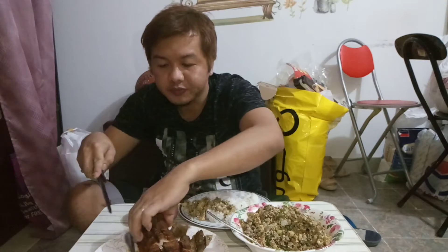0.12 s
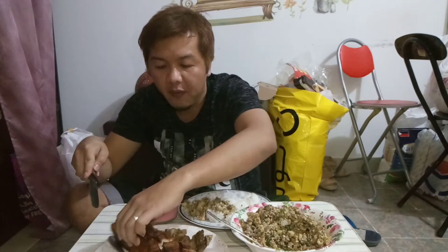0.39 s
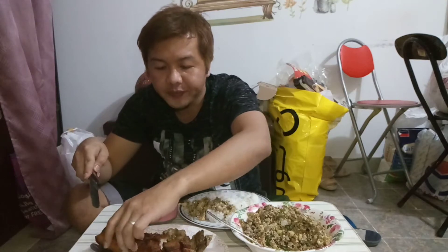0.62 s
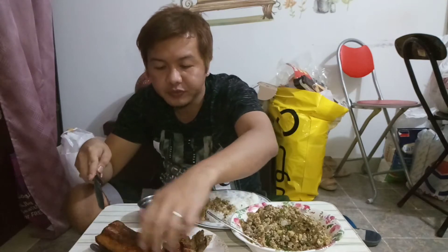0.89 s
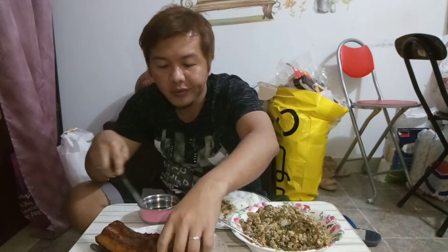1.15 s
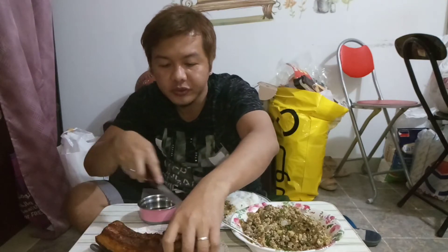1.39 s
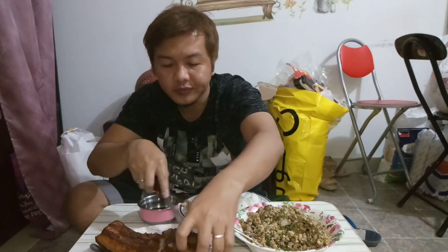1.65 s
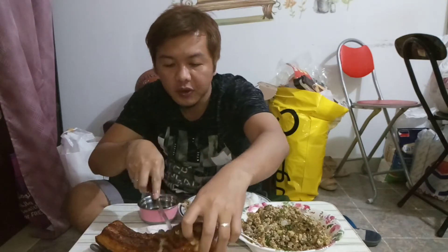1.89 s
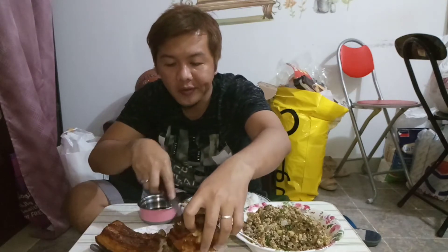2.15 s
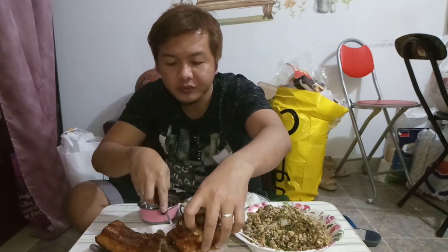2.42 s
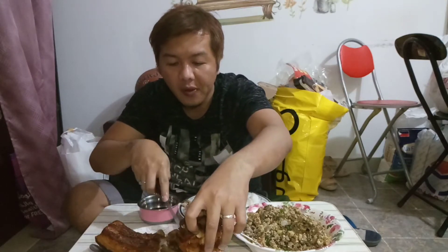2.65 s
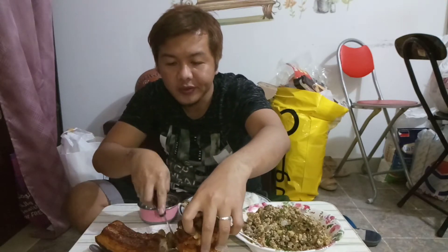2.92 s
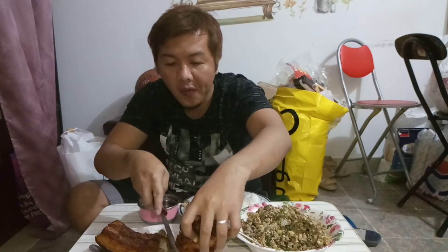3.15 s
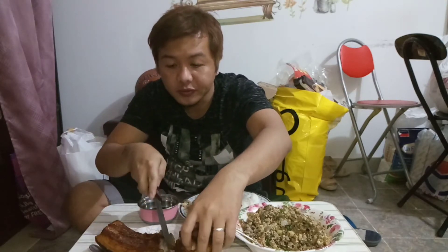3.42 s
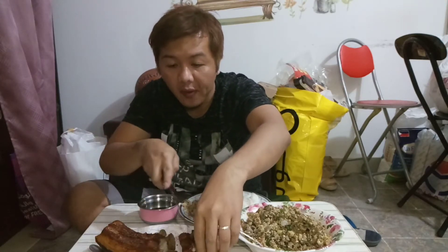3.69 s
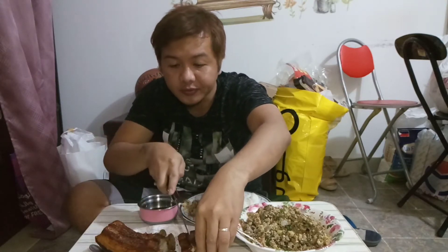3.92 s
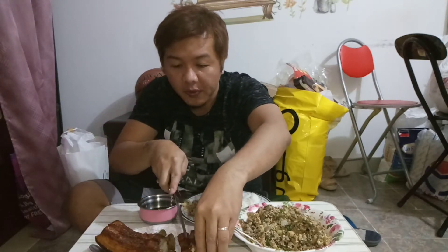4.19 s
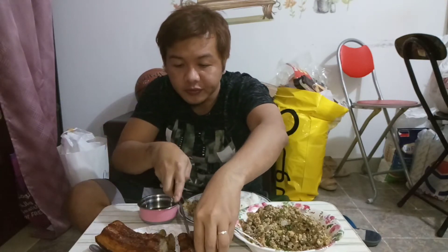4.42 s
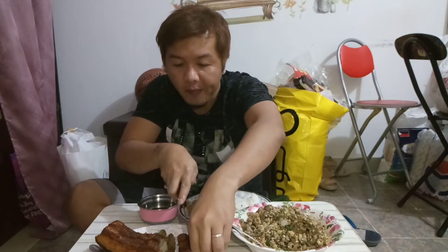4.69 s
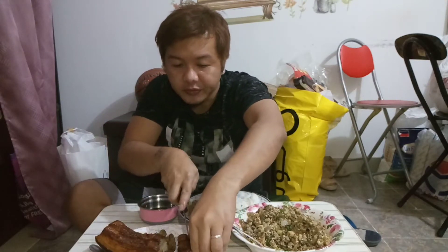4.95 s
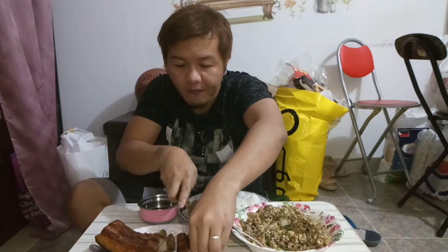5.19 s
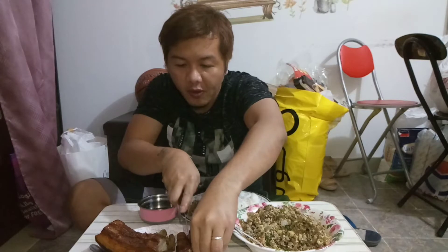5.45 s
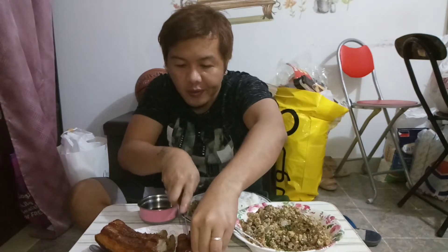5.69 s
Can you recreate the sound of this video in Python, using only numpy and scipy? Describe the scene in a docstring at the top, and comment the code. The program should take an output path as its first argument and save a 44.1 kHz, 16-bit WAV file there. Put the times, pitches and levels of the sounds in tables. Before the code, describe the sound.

Sharp knife blows clack on a plate, with crisp crust snapping, small clinks and faint scrapes in a small hard-walled room.

```python
"""A knife saws through crisp roast skin on a plate in a small tiled room, heard by a phone's microphone.
A low household rumble and faint hiss, both filtered noise, run throughout. Over them the blade drags as
random grit ringing through squeak tones, and the tiled walls answer with a short tail of fading noise.
Short bright noise ticks are crust snaps and the hard edge of the blade's blows on the plate; clinks and
table knocks mix a noise burst with decaying sines. Past three seconds the free blade sings once, as sines."""
import sys
import numpy as np
from scipy import signal
from scipy.fft import rfft, irfft
from scipy.io import wavfile
from scipy.ndimage import uniform_filter1d

SR = 44100
rng = np.random.default_rng(int(sys.argv[2]) if len(sys.argv) > 2 else 0)


def wav_out(sig):
    """Save sig, one row per channel (or a flat mono array), as 16-bit PCM at SR to the path in sys.argv[1]."""
    wavfile.write(sys.argv[1], SR, np.round(np.clip(np.atleast_2d(sig).T, -1, 1) * 32767).astype(np.int16))


def to_linear_factor(level_db):
    """Convert decibel levels (scalar or array-like) to linear amplitude factors."""
    exponent = np.asarray(level_db, float) / 20
    return 10 ** exponent


N = 257103  # length of the scene in samples


def unit(x):
    """Scale a sound to an rms (average strength) of 1."""
    return x / np.sqrt(np.mean(x ** 2))


def colour(x, points, causal=False):
    """Filter by a (Hz, dB) curve on a log-frequency axis; causal keeps all sound after the blow."""
    hz, db = np.transpose(sorted(points))
    f = np.maximum(np.fft.rfftfreq(len(x), 1 / SR), 1)
    gain = to_linear_factor(np.interp(np.log(f), np.log(hz), db))
    if causal:
        # Folding the cepstrum forward in time gives a minimum-phase filter.
        cepstrum = irfft(np.log(gain), len(x))
        cepstrum[1:len(x) // 2] *= 2
        cepstrum[len(x) // 2 + 1:] = 0
        gain = np.exp(rfft(cepstrum))
    return irfft(rfft(x) * gain, len(x))


def convolve(x, kernel):
    """Let every sample of x set off the kernel, cut to the length of x."""
    return signal.fftconvolve(x, kernel)[:len(x)]


def add(track, s, sound):
    """Mix a sound into the track at a time in seconds."""
    i = int(s * SR)
    track[i:i + len(sound)] += sound[:len(track) - i]


def ring(modes, spread_db, longest_s, size=16384):
    """Decaying sines of a damped body; each call shares the force among them afresh."""
    hz, db, t60 = np.transpose(modes)[:, :, None]
    chance = rng.standard_normal((len(modes), 3, 1))
    t = np.arange(size) / SR
    hz = hz * (1 + .006 * chance[:, 2])  # the load on the body shifts its modes a little
    # Damping by hand and food adds to each mode's own fading.
    fade = np.exp(-np.log(1000) * t * (1 / t60 + 1 / longest_s))
    level = to_linear_factor(db + spread_db * chance[:, 0])
    sines = np.sin(2 * np.pi * hz * t + chance[:, 1])
    return np.sum(level * fade * sines, axis=0)


def strike(body, ms, ring_db, points):
    """Contact noise swells and jangles while the body's ring builds up; the curve alone sets the energy."""
    ms = max(ms, .2)
    t = np.arange(len(body)) / SR / (ms / 1000)  # time counted in contact times
    chatter = to_linear_factor(3.5 * np.repeat(rng.standard_normal(len(t) // 64), 64))  # tiny re-touches
    fall = np.exp(-t) + to_linear_factor(-12) * np.exp(-t / 5)
    burst = (1 - np.exp(-2 * t)) * fall / np.sqrt(ms)
    noise = to_linear_factor(9) * burst * chatter * rng.standard_normal(len(t))
    ringing = to_linear_factor(ring_db) * body * (1 - np.exp(-t))
    sound = colour(noise + ringing, points, causal=True)
    curve_strength = np.linalg.norm(colour(1. * (t == 0), points))
    return to_linear_factor(32.5) * sound / np.linalg.norm(sound) * curve_strength


def background():
    """A low rumble of filtered noise swells and wavers, over steady filtered hiss."""
    # Slow swell of the rumble. Each row: time in seconds, level in dB.
    rumble_level = [(0.0, -61.5), (0.28, -63), (0.66, -61.5), (1.96, -64.5), (2.43, -63.5), (2.55, -65.5),
                    (2.94, -61), (3.44, -65), (4.14, -64.5), (4.38, -64.5), (5.11, -63.5), (5.45, -66),
                    (5.68, -62.5), (5.83, -59)]
    # Tone curve of the rumble. Each row: frequency in Hz, strength in dB per Hz.
    rumble_tone = [(15, -61), (25, -20.5), (43, -9.5), (64, -20), (86, -6), (148, -2), (199, -8),
                   (300, -7.5), (368, -16), (401, -10), (501, -21), (605, -14.5), (671, -24.5), (1200, -34),
                   (1500, -36.5), (1950, -77.5), (3300, -120)]
    # Tone curve of the hiss. Each row: frequency in Hz, strength in dB per Hz.
    hiss_tone = [(530, -34.5), (900, -3), (1480, -11.5), (1710, -1), (1820, -4.5), (1980, -5),
                 (5310, -10.5), (5770, -7.5), (7500, -18), (13100, -22), (15500, -10)]
    hiss_db = -82.5
    waver_per_s, waver_db = 9, 2.5  # quicker random wavering; dB scales it before smoothing
    t, hold = np.arange(N) / SR, int(SR / waver_per_s)
    waver = uniform_filter1d(np.repeat(rng.standard_normal(200), hold)[:N], hold)
    swell = to_linear_factor(np.interp(t, *np.transpose(rumble_level)) + waver_db * waver)
    rumble = unit(colour(rng.standard_normal(N), rumble_tone)) * swell
    hiss = to_linear_factor(hiss_db) * unit(colour(rng.standard_normal(N), hiss_tone))
    return rumble + hiss


def grit(rate, spread_db):
    """Random ticks of very uneven size, at a rate per second."""
    hit = rng.random(N) < rate / SR
    return unit(hit * rng.standard_normal(N) * to_linear_factor(spread_db * rng.exponential(size=N)))


def strokes():
    """Gains of drag and crumble: each stroke fades in, swells or sags evenly in dB, and fades out."""
    # Saw strokes. Each row: start in seconds, length in seconds, gain of the blade drag in dB and
    # of the crust crumble in dB (both at the end of the stroke), swell over the stroke in dB.
    saw_strokes = [(0.19, 0.22, -78, -83, 0), (0.40, 0.042, -85, -70, 2),
                   (0.462, 0.096, -48.5, -45.5, 24.5), (0.68, 0.076, -84, -95, -4),
                   (1.22, .07, -92, -101, -3), (1.43, 0.053, -89, -99, -2), (2.418, 0.1, -90.5, -95.5, 1),
                   (3.285, .04, -94, -78, 8.5), (3.399, 0.031, -94.5, -91, 1),
                   (3.599, 0.19, -90.5, -92, -0.5), (3.77, 0.06, -95, -94, -8.5),
                   (4.35, 0.032, -81, -76.5, 12), (4.42, 0.11, -76, -92, 14.5),
                   (4.60, 0.15, -94, -94.5, -1), (4.93, 0.23, -88.5, -92.5, 0),
                   (5.22, 0.44, -95.5, -86.5, 0.5), (5.687, 0.02, -87, -96, -12),
                   (5.745, 0.017, -90, -66.5, 23)]
    edge_s = 0.015  # length of each fade
    t, gains = np.arange(N) / SR, np.zeros((2, N))
    for s, length, drag_db, crumble_db, swell_db in saw_strokes:
        gate = np.clip(np.minimum(t - s + edge_s, s + length + edge_s - t) / edge_s, 0, 1)
        progress = np.clip((t - s) / length, 0, 1)
        push = gate * to_linear_factor(swell_db * (progress - 1))
        gains += to_linear_factor(np.array([[drag_db], [crumble_db]])) * push
    return gains


def sawing():
    """Stick-slip grit excites squeak tones under the drag; crumbs add a fine high crackle."""
    # Squeak tones heard under the drag. Each row: pitch in Hz, width in Hz before the extra damping, # level in
    # dB.
    squeak_tones = [(2330, 34, -6.5), (2730, 81, -5.5), (3250, 100, -2), (3560, 65, -8.5), (4320, 94, -3.5),
                    (5200, 51, -7.5), (6086, 70, -3.5), (7200, 77, -4), (7100, 101, -16), (8300, 63, -19.5)]
    slip = grit(rate=2500, spread_db=1.5)
    crumbs = grit(rate=3000, spread_db=1.5)
    drag, crumble = strokes()
    # A wider tone dies sooner.
    tones = [(hz, db, np.log(1000) / np.pi / width) for hz, width, db in squeak_tones]
    squeak_body = ring(tones, spread_db=1, longest_s=.5)
    squeak = convolve(slip * drag, squeak_body / np.linalg.norm(squeak_body))
    crumb = colour(crumbs, [(2500, 5), (5500, -6.0), (7000, 7.0), (8500, -26.0), (14000, -30.0)])
    return to_linear_factor(-1) * squeak + to_linear_factor(-8) * unit(crumb) * crumble


def room():
    """Echo of the tiled walls: bands of noise that die sooner in the treble."""
    # How long the echo lasts. Each row: frequency in Hz, time to fall by 60 dB in seconds.
    echo_times = [(150, .3), (600, .3), (2500, .25), (6000, .21), (12000, .16)]
    room_db, build_up_s = -2, 0.0025
    t = np.arange(24000) / SR
    hz, t60 = np.transpose(echo_times)
    tail = 0
    for f in 90 * 2 ** np.arange(0, 7.6, .5):  # half-octave bands
        edges = [(f / 1.42, -40), (f / 1.19, -3), (f, 0), (f * 1.19, -3), (f * 1.42, -40)]
        decay = np.interp(np.log(f), np.log(hz), t60)
        band = colour(rng.standard_normal(len(t)), edges)
        tail = tail + band * np.exp(-np.log(1000) * t / decay)
    tail = tail * (1 - np.exp(-t / build_up_s))  # reflections build up
    return to_linear_factor(room_db) * tail / np.linalg.norm(tail)


def bright_ticks():
    """Noise ticks of about a millisecond, each strongest at its own pitch: crust snaps and blow edges."""
    # Short bright ticks: crust snaps, and the sharp hard edge of the blade's blows on the plate.
    # Each row: time in seconds, relative level in dB, pitch in Hz, narrowness in dB
    # (how far the sound beside the pitch is turned down).
    tick_rows = [(0.3169, -58, 6000, -1.5), (0.534, -23, 6740, 14), (0.725, -64, 8200, 8.5),
                 (1.002, -65, 5200, 3), (1.169, -62, 8110, 14), (1.3403, -51.5, 7030, 22),
                 (1.9297, -52, 8170, 0), (2.1982, -21, 6200, 7), (2.46, -72.5, 8300, 23),
                 (2.4793, -62.5, 7050, 31), (2.556, -63, 11000, 3), (2.563, -57.5, 10300, 12),
                 (2.736, -60, 6670, 30), (2.7445, -21.5, 5410, 19), (2.8822, -55.5, 3400, 2),
                 (3.315, -66, 6500, 4.5), (3.357, -55.5, 6940, 17.5), (3.6151, -73, 7550, 7.5),
                 (3.7255, -68, 5880, 6), (3.742, -65, 6316, 5), (4.9536, -65.5, 6943, 20),
                 (5.3287, -67, 6800, 14.5), (5.342, -71.5, 6900, 15), (5.3696, -72.5, 6800, 9.5),
                 (5.486, -76.5, 5980, 5), (5.59, -72.5, 7300, 10), (5.614, -64.5, 7200, 7.5),
                 (5.6294, -56.5, 7000, 28), (5.656, -47, 7000, 5.5), (5.678, -52, 6730, 6.5)]
    out, t = np.zeros(N), np.arange(1024) / SR
    for s, db, hz, narrow_db in tick_rows:
        noise = rng.standard_normal(len(t)) * t * np.exp(-t / 0.00095)
        points = [(hz / 3, -3 * narrow_db - 6), (hz / 1.25, -narrow_db), (hz / 1.07, 0), (hz * 1.07, 0),
                  (hz * 1.1, -narrow_db), (15000, -narrow_db - 23.5)]
        tick = colour(noise / np.linalg.norm(noise), points, causal=True)
        add(out, s - .0012, to_linear_factor(db + 24.5) * tick)
    return out


def clinks(focus):
    """Each clink favours a low and a high region of the plate, set by the spot struck.

    focus is the share of the two picked-out pitches that is heard: all in front of the plate,
    little off the walls."""
    # Blade meets plate. Each row: time in seconds, relative level of the low clink in dB, its pitch
    # in Hz, relative level of the high clink in dB, its pitch in Hz.
    blows = [(0.3202, -46.5, 3130, -48.5, 6500), (0.356, -55, 3100, -66, 5800),
             (0.533, -32.5, 3600, -38, 6060), (0.725, -59.5, 2810, -65, 5760),
             (1.0155, -53.5, 2620, -80, 7480), (1.0204, -43.5, 2810, -58, 7500),
             (1.926, -55, 2500, -63, 3800), (1.9368, -43.5, 2620, -49, 4660),
             (1.958, -57.5, 3100, -65, 4660), (2.1983, -24, 3360, -27, 5970),
             (2.543, -49.5, 2434, -65, 5690), (2.552, -46, 2504, -49, 4100), (2.557, -44, 2500, -43, 4100),
             (2.561, -50.5, 3250, -61, 5200), (2.572, -50, 3020, -64, 5200),
             (2.582, -58.5, 2530, -54, 5200), (2.7448, -25.5, 2830, -22.5, 5490),
             (2.8798, -46, 2810, -45, 5080), (3.333, -72, 2940, -57, 5800),
             (3.343, -67.5, 3000, -55.5, 5800), (3.357, -61, 3850, -52, 5850),
             (3.6088, -69.5, 2400, -84.5, 5450), (3.642, -66, 2400, -82.5, 5770),
             (3.643, -69, 1550, -85, 5770), (3.664, -70.5, 2400, -85, 5770),
             (3.858, -71.5, 2590, -78.5, 6385), (4.137, -59, 2370, -57, 7536),
             (4.141, -45, 2280, -45.5, 6570), (4.1448, -55.5, 1550, -49, 5760),
             (4.155, -55, 3420, -63, 5970), (4.168, -62.5, 3740, -75, 6570), (4.38, -79.5, 2830, -63, 6000),
             (4.389, -58.5, 3500, -51, 5950), (4.389, -59, 4290, -54.5, 6690),
             (4.514, -70, 2427, -77, 6420), (4.531, -64.5, 2700, -83, 5910),
             (4.537, -54, 1840, -63.5, 5970), (4.5399, -55, 2374, -57.5, 7240),
             (4.567, -65.5, 2390, -78, 6000), (4.591, -67, 2400, -84, 5990),
             (5.0625, -61.5, 2537, -55, 5050), (5.067, -49, 2620, -51.5, 5050),
             (5.077, -59.5, 2290, -58, 6200), (5.126, -61.5, 2990, -65, 6600),
             (5.7737, -54, 3270, -46.5, 5510), (5.8191, -58.5, 1850, -54, 6700)]
    # Modes of the plate. Each row: pitch in Hz, level in dB, time to fall by 60 dB in seconds
    # before the extra damping.
    plate_modes = [(1550, -5.5, 0.45), (1840, -4.5, 0.25), (2010, -10, 0.072), (2219.4, -5, 0.9),
                   (2320, -2.5, 0.088), (2400, 0, 0.36), (2620, -5, 0.2), (2697, 0, 0.086),
                   (2818, -3.5, 0.4), (2911, -2, 0.089), (2850, -17, 0.18), (3496, -4, 0.13),
                   (3524, -3, 0.26), (3920, -11, 0.22), (3980, -17.5, 0.14), (4290, -7.5, 0.18),
                   (4660, -12.5, 0.4), (5080, -8, 0.072), (5130, -17, 0.5), (5500, -8.5, 0.17),
                   (5743, -15, 0.34), (5970, -5.5, 0.069), (6570, -8.5, 0.078), (7640, -11, 0.16),
                   (7100, -10.5, 0.32), (7400, -21, 0.23), (7650, -28, 0.57), (7980, -22, 0.46),
                   (8170, -17.5, 0.16), (8300, -19.5, 0.15)]
    out = np.zeros(N)
    for s, low_db, low_hz, high_db, high_hz in blows:
        loudest = max(low_db, high_db)
        # A harder blow touches for a shorter time (milliseconds).
        ms = 3.2 - 0.1782 * (max(loudest, -45) + 40)
        # A lighter touch picks out fewer modes: the sound beside its two pitches drops further.
        focus_db = np.clip(8 - 0.4 * (loudest + 40), 3, 14)
        low, high, peak_db = low_db - focus_db, high_db - focus_db, focus * focus_db
        middle_hz = np.sqrt(1.25 * low_hz * high_hz)
        points = [(low_hz / 3, low - 26), (low_hz / 1.8, low - 6), (low_hz / 1.09, low),
                  (low_hz, low + peak_db), (low_hz * 1.3, low), (middle_hz, min(low, high) - 1.5),
                  (high_hz / 0.88, high), (high_hz, high + peak_db), (high_hz * 1.06, high),
                  (high_hz * 1.4, high - 5), (11500, high - 30.0), (16000, high - 46)]
        body = ring(plate_modes, spread_db=3, longest_s=.05)
        add(out, s - .0004 * ms, strike(body, ms, ring_db=1.3 * peak_db - 15, points=points))
    return out


def knocks():
    """The plate knocks on the table top, which answers lower than the plate."""
    # Knocks. Each row: time in seconds, relative level in dB, pitch in Hz, fall away from that
    # pitch in dB.
    table_knocks = [(0.32, -53.5, 282, 6.5), (0.532, -32.5, 643, 11.5), (1.937, -55, 304, 5),
                    (2.198, -24, 340, 3), (2.553, -63, 405, 7), (2.745, -26.5, 310, 6),
                    (5.776, -35.5, 513, 14.5)]
    # Modes of the table top. Each row: pitch in Hz, level in dB, time to fall by 60 dB in seconds
    # before the extra damping.
    table_modes = [(183, -7, 0.13), (286, -2, 0.067), (334, -1.5, 0.25), (424, -2, 0.32), (464, -3.5, 0.48),
                   (578, 0.5, 0.18), (642.4, 2, 0.76), (640, -9, 0.1), (788, -4, 0.59), (950, -2.5, 0.02),
                   (1014, -8.5, 0.23), (1310, -15, 0.11)]
    out = np.zeros(N)
    for s, db, hz, fall_db in table_knocks:
        beside = db - fall_db
        points = [(60, db - 28.5), (160, beside), (hz / 1.3, beside), (hz, db), (hz * 1.3, beside),
                  (1000, beside - 1.5), (1500, beside - 9.5), (3000, db - 48.0)]
        body = ring(table_modes, spread_db=1.5, longest_s=.04)
        add(out, s - .001, strike(body, 3, ring_db=-7, points=points))
    return out


def singing_blade():
    """The free blade sings after one touch, as decaying sines."""
    # Modes of the blade. Each row: pitch in Hz, level in dB, time to fall by 60 dB in seconds
    # before the extra damping.
    blade_modes = [(7752, 0, 0.3), (8947, -11, 0.4)]
    start_s, level_db = 3.366, -68.5
    out = np.zeros(N)
    add(out, start_s, to_linear_factor(level_db) * ring(blade_modes, spread_db=0, longest_s=1.5))
    return out


def scene():
    """Table sounds, their echo and the background; bright ticks beam forward and stir the room less."""
    ware, ticks = knocks() + sawing(), bright_ticks()
    # The walls and the direct path each draw the clinks and the singing blade afresh.
    walls = clinks(focus=.35) + singing_blade() + ware + to_linear_factor(-4) * ticks
    direct = clinks(focus=1) + singing_blade() + ware + ticks
    return (direct + convolve(walls, room()) + background())[None]


def roll_off(x):
    """The treble ends steeply here."""
    return signal.sosfilt(signal.butter(12, 15990, fs=SR, output="sos"), x)


def record(dry):
    """The phone's microphone rolls off the lowest bass and the very top."""
    heard = colour(dry[0], [(30, -4), (60, 2.0), (15200, 0.0), (15900, -30.5)])
    return roll_off(heard[None])


dry = scene()
out = record(dry)
wav_out(out)
```